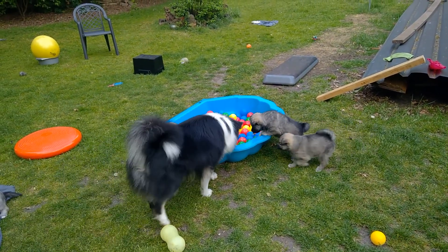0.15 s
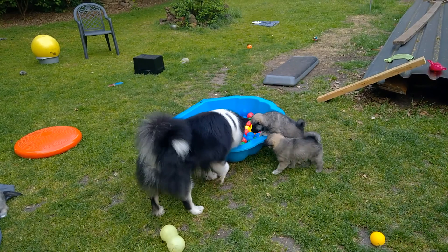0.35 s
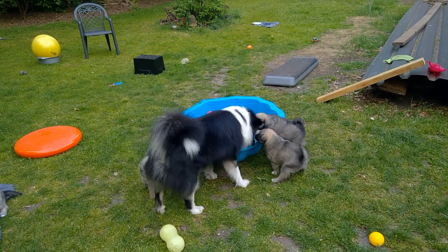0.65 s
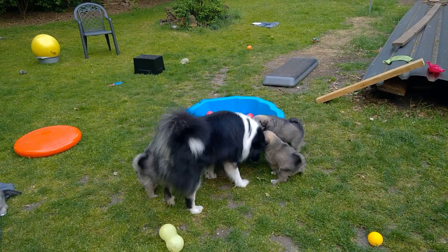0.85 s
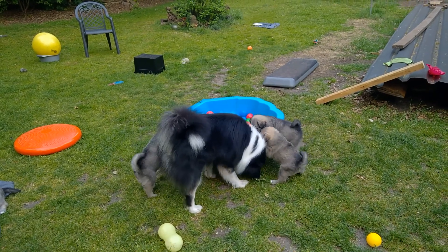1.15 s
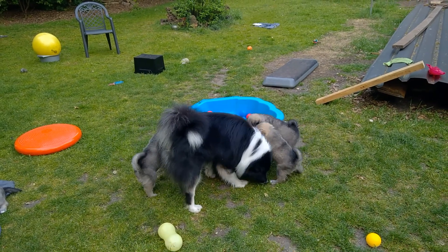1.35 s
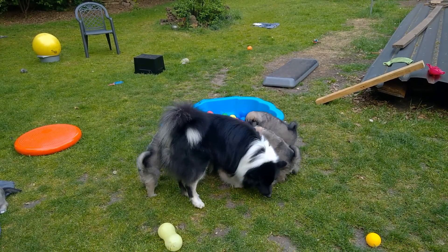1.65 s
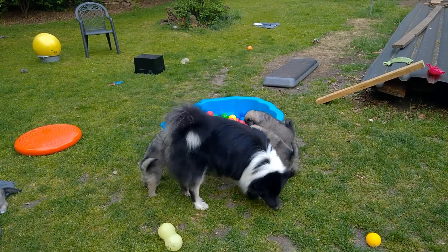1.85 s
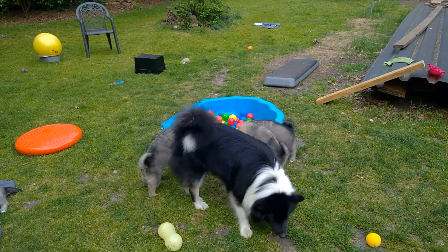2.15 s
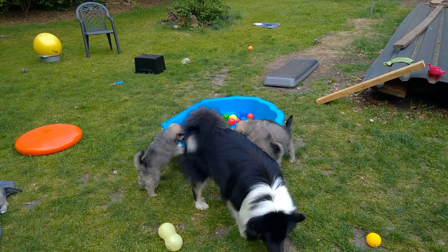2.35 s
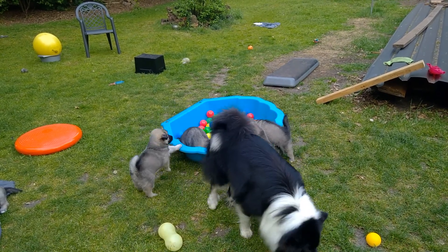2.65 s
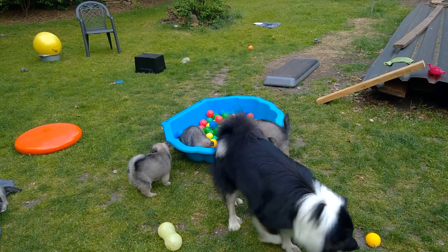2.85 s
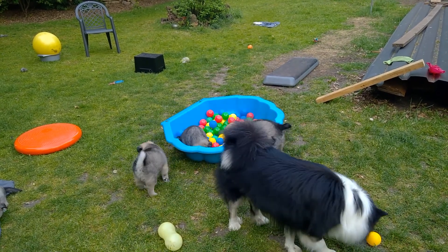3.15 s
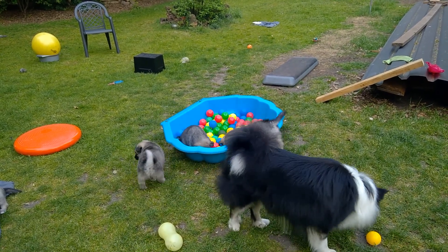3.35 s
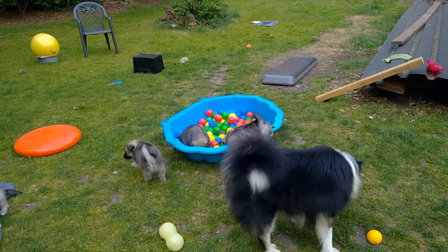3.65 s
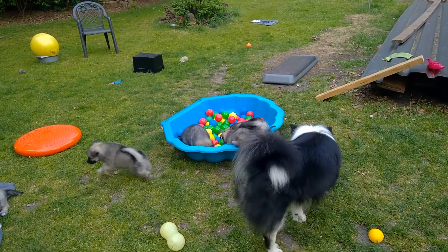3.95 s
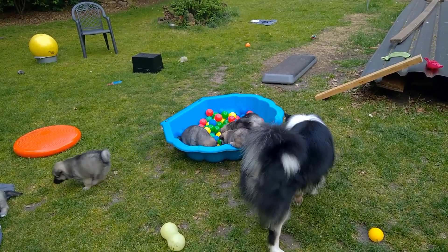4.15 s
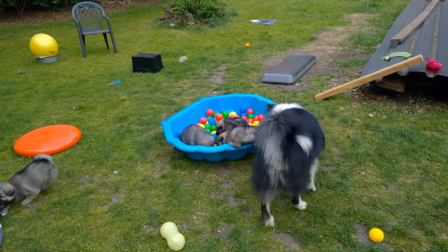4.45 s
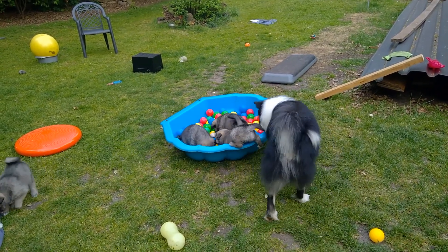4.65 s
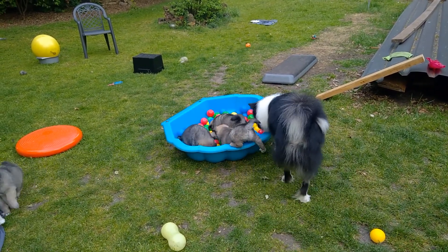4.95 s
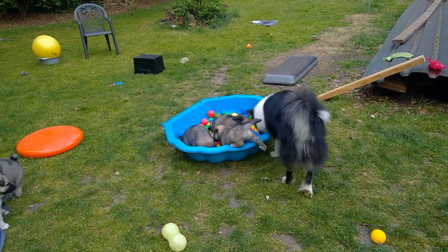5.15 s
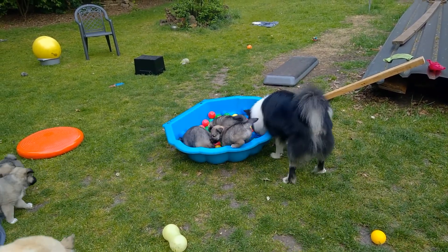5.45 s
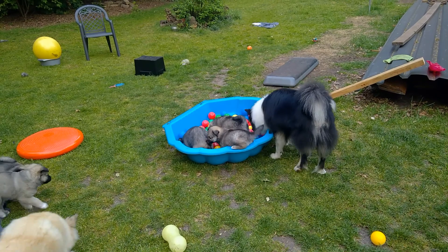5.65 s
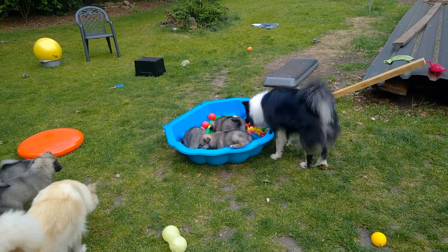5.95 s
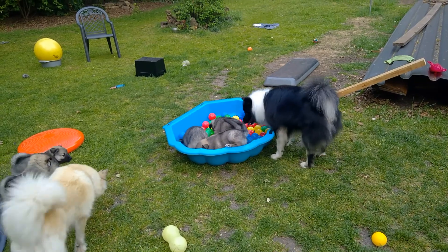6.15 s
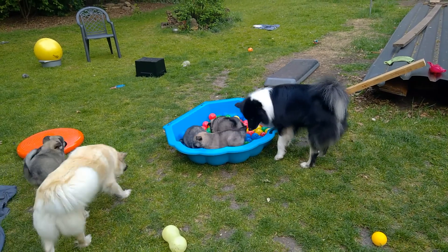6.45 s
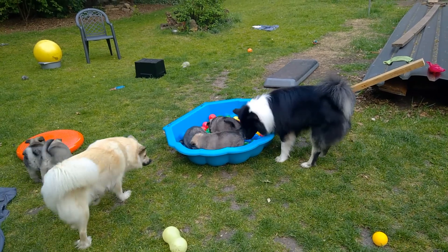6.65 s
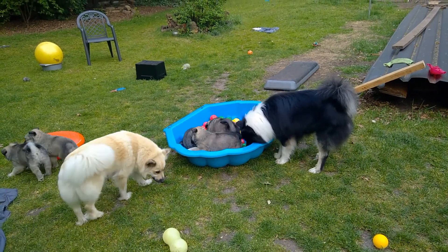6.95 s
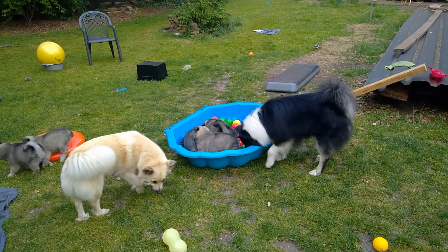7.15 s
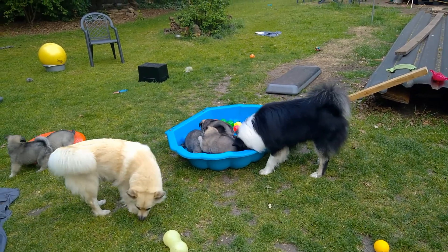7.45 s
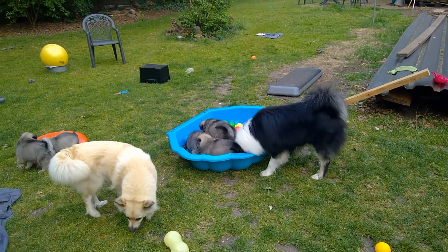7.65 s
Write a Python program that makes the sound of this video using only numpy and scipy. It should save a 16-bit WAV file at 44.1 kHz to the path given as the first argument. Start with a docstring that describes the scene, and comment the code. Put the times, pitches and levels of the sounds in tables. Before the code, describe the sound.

Hollow, short, woody-plastic knocks and dense jostling of light balls come in uneven bouts from a pool at moderate distance outdoors. Near birds give gliding whistles, hooked notes and quick chips with soft echoes, while far birds twitter thinly. The busiest song overlaps the middle clatter; after a lull, rummaging grows denser and louder to the finish. Soft traffic rumble lies beneath, with a dull left channel and clear right.

```python
"""Puppies and a grown dog root through hollow plastic balls in a plastic shell pool on a lawn.
A faint stir and a thin far call open; a flurry of knocks follows near 0.5 s, rung from shell modes.
Birds, as gliding sine tones with echoes, hook and chip, then sing thickest from 3 to 5.4 s over more knocks.
After a lull, knocks, jostling balls (dense random contacts) and grass crackle build from 6 s to the end.
Far traffic, as coloured noise, hums throughout; the left microphone is muffled."""
import sys
import numpy as np
from scipy import signal
from scipy.fft import rfft, irfft, next_fast_len
from scipy.io import wavfile
from scipy.ndimage import map_coordinates

SR = 44100
rng = np.random.default_rng(int(sys.argv[2]) if len(sys.argv) > 2 else 0)


def store_pcm(level_fs):
    """Save levels as 16-bit WAV."""
    pcm = np.round(np.clip(level_fs, -1, 1) * 32767).astype(np.int16)
    wavfile.write(sys.argv[1], SR, np.atleast_2d(pcm).T)


N = 343539   # length in samples


def from_db(db):
    """Decibels to gain."""
    return 10 ** (np.asarray(db) / 20)


def rms_one(x):
    """Scale to unit power."""
    return x / np.sqrt(np.mean(x ** 2) + 1e-20)


def in_time(rows):
    """Read each column of a time curve at every sample."""
    s, *columns = np.transpose(rows)
    return [np.interp(np.arange(N) / SR, s, column) for column in columns]


def at_hz(points, hz):
    """Read a spectrum on a log-frequency axis."""
    point_hz, values = np.array(points).T
    return np.interp(np.log(hz + 1e-9), np.log(point_hz), values)


def add(out, start_s, sound):
    """Mix a sound in at a time."""
    i = int(np.clip(start_s * SR, 0, N - 1))
    out[i:i + len(sound)] += sound[:N - i]


def drift(rate_hz, size=N):
    """A random wander: straight lines between normal random knots of unit spread."""
    knots = rng.standard_normal(int(size / SR * rate_hz) + 4)
    return map_coordinates(knots, [np.arange(size) * rate_hz / SR], order=1)


def coloured(x, spectrum):
    """Filter by a spectrum, with padding after the sound."""
    size = next_fast_len(N + 4096)
    hz = np.arange(size // 2 + 1) * SR / size
    return irfft(rfft(x, size) * from_db(at_hz(spectrum, hz)), size)[..., :N]


def grains(per_s, spread_db):
    """Random clicks of uneven size and either sign."""
    sizes_db = spread_db * np.minimum(rng.exponential(1, N), 3)
    sizes = from_db(sizes_db) * rng.choice([-1, 1], N)
    return sizes * (rng.random(N) < per_s / SR)


def ring(clicks, hz, t60_s):
    """A two-pole resonator: a unit click sets off a sine of about unit height that decays."""
    r, w = from_db(-60 / (t60_s * SR)), 2 * np.pi * hz / SR
    return signal.lfilter([0, np.sin(w)], [1, -2 * r * np.cos(w), r * r], clicks + 1e-18)


def swells(rows, attack_s, settle_s):
    """Each movement builds up along a bell curve, holds and dies away exponentially."""
    t = np.arange(N) / SR
    total = np.zeros(N)
    for start_s, length_s, level_db in rows:
        rise = np.clip((start_s - t) / attack_s, 0, 20) ** 2
        fall = np.clip((t - start_s - length_s) / settle_s, 0, 20)
        total += from_db(level_db) * np.exp(-rise - fall)
    return total


def garden(x, t60_s, first_s):
    """Scattered echoes from fences, house and trees, different at each microphone."""
    t = np.arange(SR) / SR
    echoes = rng.standard_normal((2, SR)) * (rng.random((2, SR)) < .05)
    echoes *= from_db(-60 * t / t60_s) * np.clip(t / first_s - .5, 0, 1)   # fades in around first_s
    echoes /= np.sqrt(np.sum(echoes ** 2, axis=1, keepdims=True))
    return signal.fftconvolve(x[None], echoes, axes=1)[:, :N]


# modes of the pool shell with its load of balls: (pitch_hz, level_db)
SHELL_MODES = [(165,-15.5),(235,-8.5),(300,-3),(375,-1),(450,-3.5),(545,-4.5),(670,-5.5),(830,0.5),(1020,1),(1240,-4.5),(1600,-22),(2100,-37)]
SHELL_CYCLES = 16.6   # cycles a mode takes to fall by 60 dB
# balls and paws striking the shell; levels are relative: (start_s, level_db, ring_centre_hz)
KNOCKS = [(0.447, -38, 705), (0.564, -31, 850), (0.584, -28, 550), (0.594, -33, 446), (0.624, -31, 238),
          (1.304, -39.5, 340), (2.296, -41, 990), (3.024, -36, 400), (3.346, -35, 790), (3.445, -36.5, 328),
          (4.035, -29.5, 417), (4.083, -31.5, 404), (4.128, -26.5, 500), (4.368, -32.5, 366),
          (4.48, -35, 980), (4.5, -29, 790), (4.57, -23.5, 365), (4.644, -30.5, 393), (5.764, -39.5, 405),
          (6.111, -37, 221), (6.252, -37.5, 409), (6.5, -38, 1090), (6.726, -30.5, 400), (6.809, -28, 473),
          (6.908, -31.5, 470), (6.991, -34.5, 250), (7.017, -26.5, 380), (7.183, -35.5, 406),
          (7.276, -32, 340), (7.299, -33, 355), (7.378, -33, 394), (7.458, -25.5, 352), (7.705, -25, 382),
          (7.737, -25.5, 430)]


def knocks(focus_db=10.5, scatter_db=2, delay_s=0.001603, rebound_db=-14, crack_db=-17, crack_s=0.002):
    """Each blow cracks and rings the shell, most strongly near its own centre; a neighbouring ball rebounds."""
    out, t = np.zeros(N), np.arange(SR // 8) / SR
    hz, mode_db = np.transpose(SHELL_MODES)[:, :, None]
    rings = np.sin(2 * np.pi * hz * t) * from_db(-60 * t * hz / SHELL_CYCLES)
    crack_band = signal.butter(2, [900, 2500], "band", fs=SR, output="sos")
    for start_s, level_db, centre_hz in KNOCKS:
        off_centre_db = focus_db * np.log2(hz / centre_hz) ** 2   # focus_db is the loss one octave away
        gains = from_db(mode_db - off_centre_db + rng.normal(0, scatter_db, hz.shape))
        # the struck spot sets the sign of each mode
        body = (gains * rng.choice([-1, 1], hz.shape) * rings).sum(axis=0)
        # a soft, low-ringing blow has a rounder onset
        body *= 1 - np.exp(-2 * t * centre_hz)
        crack = signal.sosfilt(crack_band, rng.standard_normal(len(t)) * np.exp(-t / crack_s))
        # harder, higher-ringing blows crack much more
        hardness = from_db(crack_db) * (centre_hz / 450) ** 2
        blow = from_db(level_db - 21.5) * rms_one(rms_one(body) + hardness * rms_one(crack))
        add(out, start_s + delay_s, blow)
        rebound = from_db(rebound_db) * blow * rng.random()
        add(out, start_s + rng.uniform(0.0059, 0.016), rebound)
    return out


# the dogs rummage among the balls in bouts; levels are relative: (start_s, length_s, level_db)
BOUTS = [(0.02, 0.15, -64), (0.46, 0.028, -57), (0.59, 0.034, -49.5), (1.35, 0.28, -56),
         (3.03, 0.038, -53.5), (3.19, 0.07, -57), (3.44, 0.082, -53.5), (3.7, 0.043, -57), (4.06, .11, -54),
         (4.23, 0.42, -45.5), (5.42, .02, -58), (6.12, 0.21, -54), (6.64, 0.019, -57), (6.77, 0.27, -51.5),
         (7.16, 0.55, -51), (7.725, .07, -42.5)]
BOUT_ATTACK_S, BOUT_SETTLE_S, RESTING_DB = 0.028, .04, -70.5
CONTACTS_PER_S = 120   # ball against ball, at a stir of -58 dB


def jostle():
    """Many light ball contacts excite the same shell; harder stirring makes them denser."""
    stir = from_db(RESTING_DB) + swells(BOUTS, BOUT_ATTACK_S, BOUT_SETTLE_S)
    stir_db = 20 * np.log10(stir)
    per_s = CONTACTS_PER_S * from_db(.35 * (np.clip(stir_db, -75, -45) + 58))
    # dividing by the root of the rate keeps the power even
    contacts = grains(per_s, spread_db=1.8) / np.sqrt(per_s)
    contacts *= from_db(3 * np.clip(drift(45), -2, 1))   # balls jam, then give way in clumps
    rings = np.zeros(N)
    for hz, mode_db in SHELL_MODES:
        mode_clicks = contacts * rng.standard_normal(N)
        rings += ring(mode_clicks, hz, SHELL_CYCLES / hz) * from_db(mode_db)
    clack = coloured(contacts, [(400, -33), (1100, 10.5), (2000, 0), (4000, -3), (12000, -21)])
    return stir * (rms_one(rings) + from_db(-10.5) * rms_one(clack))


# sharp plastic ticks and snapping grass; levels are relative: (start_s, level_db)
TICKS = [(1.969, -43.5), (3.344, -52.5), (4.257, -38.5), (4.3674, -46), (6.2064, -47), (6.502, -50),
         (6.5615, -44), (7.154, -48.5), (7.4522, -42), (7.4772, -39)]


def ticks(decay_s=0.0036):
    """Very short bright cracks: decaying bursts of band-passed noise."""
    out, t = np.zeros(N), np.arange(SR // 40) / SR
    for start_s, level_db in TICKS:
        burst = rng.standard_normal(len(t)) * np.exp(-t / decay_s)
        add(out, start_s + 0.00048, from_db(level_db) * burst)
    return signal.sosfilt(signal.butter(1, [2500, 9000], "band", fs=SR, output="sos"), out)


# fur and paws brushing past, and at 1.48 s the hiss of a harsh bird chatter: (start_s, length_s, level_db)
BRUSH_STROKES = [(1.48, .13, -49), (3.18, 0.017, -52), (4.23, 0.23, -52), (6.96, 0.075, -53.5),
                 (7.43, 0.055, -54)]
BRUSH_ATTACK_S, BRUSH_SETTLE_S = 0.017, 0.057
# relative spectrum of these strokes: (frequency_hz, level_db)
BRUSH_COLOUR = [(1000,-2.5),(3800,-1.5),(7000,-3),(12000,-16),(16000,-29)]


def brushing():
    """Fine crackle swells over a faint constant one: grass and fur flicking past, and one harsh bird chatter."""
    strokes = swells(BRUSH_STROKES, BRUSH_ATTACK_S, BRUSH_SETTLE_S) + from_db(-73)
    crackle = grains(6000, spread_db=3) * from_db(2.5 * drift(55))
    return strokes * rms_one(coloured(crackle, BRUSH_COLOUR))


CUTOFF_HZ = 15750   # top of the microphones' range; higher octaves are left unsung


def syrinx(hz, fade, flutter_db, overtone_db):
    """A nearly pure tone that swells and fades, with a faint octave."""
    phase = 2 * np.pi * np.cumsum(hz) / SR
    swell = signal.windows.tukey(len(hz), np.clip(fade, .1, 1)) * from_db(flutter_db * drift(170, len(hz)))
    octave = from_db(overtone_db) * np.sin(2 * phase) * (hz < CUTOFF_HZ / 2)
    return rms_one(swell * (np.sin(phase) + octave))


def note(hz, waver=0.0078, flutter_db=2.5):
    """One sung note on a pitch path, wavering slightly."""
    return syrinx(hz * (1 + waver * drift(488, len(hz))), fade=0.24, flutter_db=flutter_db, overtone_db=-32)


# a near songbird's whistles; levels are relative: (start_s, length_s, start_hz, end_hz, level_db)
WHISTLES = [(0.626, 0.046, 4400, 3725, -40.5), (0.728, 0.043, 6700, 8600, -53.5),
            (0.761, 0.022, 4200, 4860, -42), (2.155, .085, 7960, 8900, -52.5),
            (2.167, 0.11, 3980, 5020, -47), (2.236, .035, 8700, 8000, -59), (3.062, .08, 3510, 2780, -42.5),
            (3.359, 0.064, 3093, 3446, -38.5), (3.382, 0.12, 5770, 5930, -48.5),
            (3.704, 0.036, 4680, 4980, -40.5), (3.742, 0.064, 4220, 2744, -36.5),
            (3.91, 0.058, 7400, 6180, -47.5), (3.968, 0.041, 7240, 5100, -45),
            (4.04, .062, 3310, 4050, -36), (4.206, 0.057, 5680, 5610, -42.5),
            (4.242, 0.043, 4310, 4094, -28.5), (4.372, 0.037, 3380, 2700, -38.5),
            (4.501, 0.045, 3200, 3180, -31), (4.559, 0.022, 4386, 2940, -34.5),
            (4.593, .052, 3170, 3750, -33.5), (4.752, 0.03, 2690, 2840, -41.5),
            (4.843, 0.073, 2777, 3110, -38), (4.915, 0.038, 3275, 3388, -32),
            (5.03, 0.028, 4320, 4320, -37.5), (5.349, 0.066, 4284, 4330, -36),
            (5.414, 0.043, 3820, 3580, -34), (6.873, .07, 7260, 7290, -51),
            (6.891, 0.0097, 3660, 3700, -43), (7.006, 0.0256, 2730, 3380, -45),
            (7.028, 0.049, 3496, 3130, -43), (7.373, 0.053, 2450, 3730, -37)]


def whistles(fall_bend=2.5, rise_bend=1.5, rise_swell_db=13):
    """Falling whistles settle onto their last pitch; rising ones lift late and swell by so many dB an octave."""
    out = np.zeros(N)
    for start_s, length_s, start_hz, end_hz, level_db in WHISTLES:
        u = np.linspace(0, 1, int(length_s * SR))
        rising = end_hz > start_hz
        height = u ** rise_bend if rising else (1 - u) ** fall_bend
        hz = min(start_hz, end_hz) + abs(end_hz - start_hz) * height
        swell = from_db(rising * rise_swell_db * np.log2(hz / start_hz))
        add(out, start_s, from_db(level_db) * rms_one(swell * note(hz)))
    return out


def chirps(notes, shape, ratio=1):
    """Notes of one kind share a pitch shape, stretched to each one's length and pitch."""
    out = np.zeros(N)
    path = np.polyfit(np.linspace(0, 1, len(shape)), shape, len(shape) - 1)
    for start_s, length_s, pitch_hz, level_db in notes:
        u = np.linspace(0, 1, int(length_s * SR))
        add(out, start_s, from_db(level_db) * note(ratio * pitch_hz * np.polyval(path, u)))
    return out


def warbles(notes, sweeps_hz, swing_hz, uneven, fade):
    """The pitch swings quickly up and down about a gliding centre."""
    out = np.zeros(N)
    for start_s, length_s, start_hz, end_hz, level_db in notes:
        size = int(length_s * SR)
        sweep_rate = sweeps_hz * (1 + uneven * drift(60, size))
        swing = np.sin(2 * np.pi * np.cumsum(sweep_rate) / SR)
        hz = np.linspace(start_hz, end_hz, size) + swing_hz * (swing + uneven * drift(400, size))
        add(out, start_s, from_db(level_db) * syrinx(hz, fade, flutter_db=1.5, overtone_db=-25))
    return out


# Near notes, with relative levels. A shape gives the share of pitch_hz at the start, thirds and end.
# hooked notes arch over and fall: (start_s, length_s, pitch_hz, level_db)
HOOKS = [(1.136, 0.038, 3720, -42), (1.334, 0.039, 3940, -43.5), (1.72, 0.046, 3620, -41),
         (1.88, 0.043, 4020, -47), (2.276, 0.02, 5100, -38), (2.296, 0.024, 4190, -38),
         (5.255, .055, 3680, -38.5), (5.39, 0.023, 4910, -38.5), (7.43, 0.049, 4135, -33.5)]
HOOK_SHAPE = [.9, 0.96, .83, 0.731]
# notes that hold, then plunge: (start_s, length_s, pitch_hz, level_db)
PLUNGES = [(3.27, 0.022, 5390, -42), (3.537, 0.025, 5770, -44.5), (3.617, 0.041, 5690, -43.5),
           (3.83, 0.047, 5180, -46), (4.178, 0.055, 5630, -42), (5.006, 0.034, 6560, -51),
           (7.577, 0.012, 5000, -43), (7.738, 0.0118, 4650, -45)]
PLUNGE_SHAPE = [0.94, .99, 0.82, 0.576]
# quick two-voiced chips: (start_s, length_s, pitch_hz, level_db)
CHIPS = [(2.649, 0.033, 6150, -44), (2.819, 0.026, 6250, -45.5), (2.84, .03, 5950, -45.5),
         (2.905, 0.024, 6250, -43.5), (2.924, 0.021, 6180, -43.5), (3.009, 0.029, 5700, -44.5),
         (3.695, .04, 6360, -44.5)]
CHIP_SHAPE = [0.59, 1, .94, 0.62]
SECOND_VOICE_RATIO, SECOND_VOICE_DB = 1.45, -14.5
# fast-warbled notes: (start_s, length_s, start_hz, end_hz, level_db)
TRILLS = [(0.865, 0.11, 6100, 4300, -43.5)]


def near_song():
    """Whistles, hooks, plunges and a trill; the chips sound both sides of the syrinx."""
    second_voice = chirps(CHIPS, CHIP_SHAPE, SECOND_VOICE_RATIO)
    chips = chirps(CHIPS, CHIP_SHAPE) + from_db(SECOND_VOICE_DB) * second_voice
    trills = warbles(TRILLS, sweeps_hz=71, swing_hz=460, uneven=0.635, fade=0.27)
    return whistles() + chirps(HOOKS, HOOK_SHAPE) + chirps(PLUNGES, PLUNGE_SHAPE) + chips + trills


# a distant bird's twitters; levels are relative: (start_s, length_s, middle_hz, level_db)
TWITTERS = [(0.275, .1, 4470, -60), (0.43, 0.042, 3430, -54), (1.438, 0.14, 3890, -44.5),
            (1.683, 0.048, 3494, -47.5), (2.018, 0.11, 4300, -50), (2.403, 0.17, 3610, -53.5),
            (3.175, 0.018, 4890, -46), (3.497, .16, 3193, -54.5), (4.075, 0.15, 4330, -51),
            (4.294, 0.19, 4100, -49), (5.452, .17, 4034, -49.5), (5.732, 0.39, 3730, -50.5),
            (6.277, 0.13, 3990, -47), (6.451, 0.12, 3446, -57.5), (7.093, 0.047, 3646, -49),
            (7.497, 0.17, 3410, -53)]
TWITTER_SAG_HZ_PER_S = 1900   # for the lower voice
# another far bird repeats one thin, high call; levels are relative: (start_s, pitch_hz, level_db)
HIGH_CALLS = [(0.05, 7800, -55), (1.159, 8400, -52.5), (2.449, 7450, -55.5), (3.461, 6950, -51.5),
              (3.94, 8490, -51.5), (5.03, 7550, -56.5), (6.18, 7620, -53)]
HIGH_CALL_S = 0.053


def far_song(second_voice_db=-11, air_cut_hz=8500):
    """Two-voiced twitters sink steadily as they warble; high calls warble about a level pitch; air dulls both."""
    twitters = []
    for start_s, length_s, middle_hz, level_db in TWITTERS:
        half_fall_hz = TWITTER_SAG_HZ_PER_S / 2 * length_s
        for ratio, voice_db in [(1, 0), (SECOND_VOICE_RATIO, second_voice_db)]:
            start_hz, end_hz = ratio * (middle_hz + half_fall_hz), ratio * (middle_hz - half_fall_hz)
            twitters.append((start_s, length_s, start_hz, end_hz, level_db + voice_db))
    calls = [(start_s, HIGH_CALL_S, hz, hz, level_db) for start_s, hz, level_db in HIGH_CALLS]
    song = warbles(twitters, sweeps_hz=109.75, swing_hz=522, uneven=.75, fade=0.29)
    song += warbles(calls, sweeps_hz=109.3, swing_hz=420, uneven=.7, fade=0.41)
    return signal.sosfilt(signal.butter(2, air_cut_hz, fs=SR, output="sos"), song)


def birds():
    """Near birds arrive directly, scattered by leaves and with an echo behind; far ones are all echo."""
    near, far = near_song(), far_song()
    leaves = from_db(-6) * garden(near, t60_s=0.08, first_s=0.0017)
    echo = from_db(-8.5) * garden(near, t60_s=.6, first_s=.015)
    echo *= 1 + .55 * drift(350)   # the echo flutters, which blurs its pitch
    distance = garden(far, t60_s=0.5, first_s=0.0018)
    return from_db(-3.5) * near + leaves + echo + from_db(2.5) * distance


# left-right correlation of the background: (frequency_hz, correlation from 0 to 1)
LIKENESS = [(90,1),(400,0.67),(1000,0.77),(8000,0.094)]


def diffuse_noise(spectrum):
    """Noise from all around: most alike at the two microphones in the bass, least in the treble."""
    mid, side = rfft(rng.standard_normal((2, N)))
    hz = np.arange(len(mid)) * SR / N
    alike = np.clip(at_hz(LIKENESS, hz), 0, 1)
    pair = np.sqrt(1 + alike) * mid + np.sqrt(1 - alike) * side * [[1], [-1]]
    return rms_one(irfft(pair * from_db(at_hz(spectrum, hz)), N))


# far traffic's rumble, swelling near 1.55 s; levels are relative: (time_s, level_db)
RUMBLE = [(0,-57.5),(.8,-58),(1.55,-52.5),(2.1,-57),(4.2,-54.5),(5.3,-59),(7.79,-57.5)]
# far traffic's tyre hum: (time_s, level_db)
TYRE_HUM = [(0,-48.5),(1.5,-48.5),(5.3,-50.5),(7.79,-49)]
# relative spectra of the rumble and of the hum: (frequency_hz, level_db)
RUMBLE_COLOUR = [(20,-16),(35,-9),(50,1.5),(65,10.5),(82,2),(105,-19),(220,-46)]
HUM_COLOUR = [(65, -11), (110, -1.5), (150, -8.5), (237, -12.5), (543, -14), (930, 2), (1960, -10.5),
              (3650, -11), (5310, -22.5), (9290, -27), (14700, -46), (15600, -49)]


def traffic():
    """A low engine rumble and the smooth hum of distant tyres, both as diffuse coloured noise."""
    (rumble_db,), (hum_db,) = in_time(RUMBLE), in_time(TYRE_HUM)
    rumble = from_db(rumble_db - 0.4) * diffuse_noise(RUMBLE_COLOUR)
    return rumble + from_db(hum_db) * diffuse_noise(HUM_COLOUR)


def scene():
    """Pool, birds and background in the open air; the lawn returns little of the pool's sound."""
    pool = from_db(5.5) * knocks() + from_db(4.5) * jostle() + from_db(7.5) * ticks() + brushing()
    lawn = from_db(-16) * garden(pool, t60_s=.25, first_s=.012)
    return pool + lawn + birds() + traffic()


# gain of the muffled left microphone: (frequency_hz, gain_db)
LEFT_GAIN = [(60,1),(110,1),(300,-11.5),(1200,-12),(2400,-16.5),(4400,-18.5),(8000,-27),(15000,-27)]
# phase lead of the left microphone, a lag where negative: (frequency_hz, lead_radians)
LEFT_PHASE = [(100,0.5),(340,1.35),(1400,-1.96),(3200,-1),(5000,-2)]


def record(dry):
    """The left microphone keeps only the bass at full strength and shifts its phase; the top is cut on both."""
    turn = np.exp(1j * at_hz(LEFT_PHASE, np.arange(N // 2 + 1) * SR / N))
    left = irfft(rfft(coloured(dry[0], LEFT_GAIN)) * turn, N)
    hiss = from_db(-81) * rng.standard_normal((2, N))
    pair = np.array([left, dry[1]]) + hiss
    return signal.sosfilt(signal.ellip(12, .1, 80, CUTOFF_HZ, fs=SR, output="sos"), pair)


dry = scene()
out = record(dry)
store_pcm(out)
```